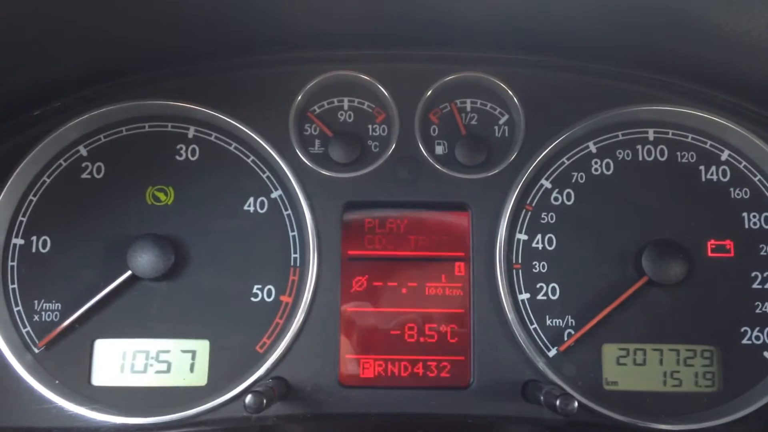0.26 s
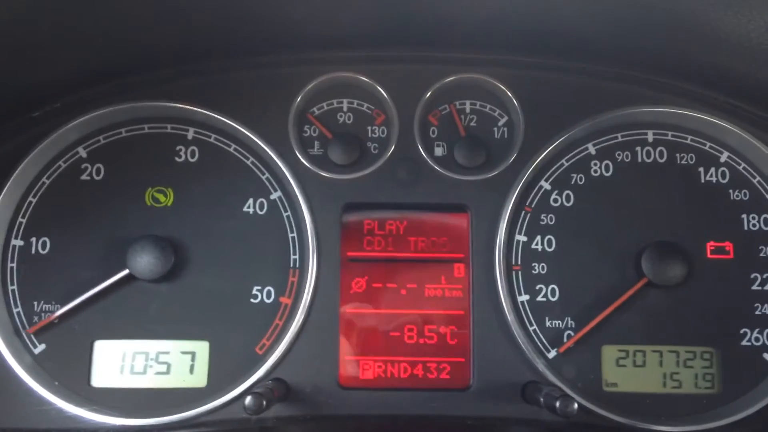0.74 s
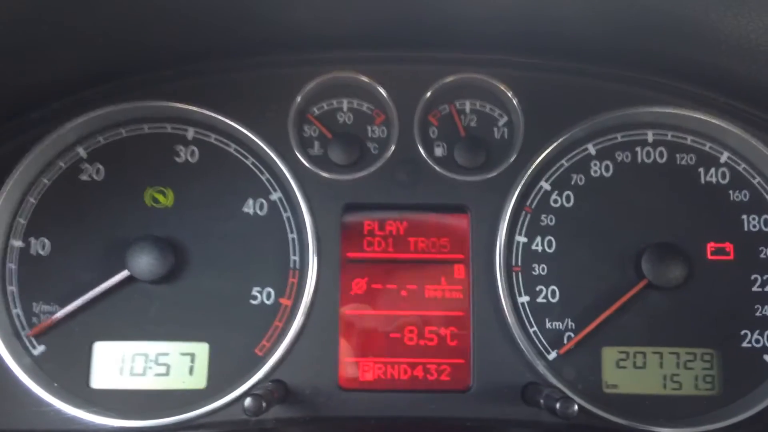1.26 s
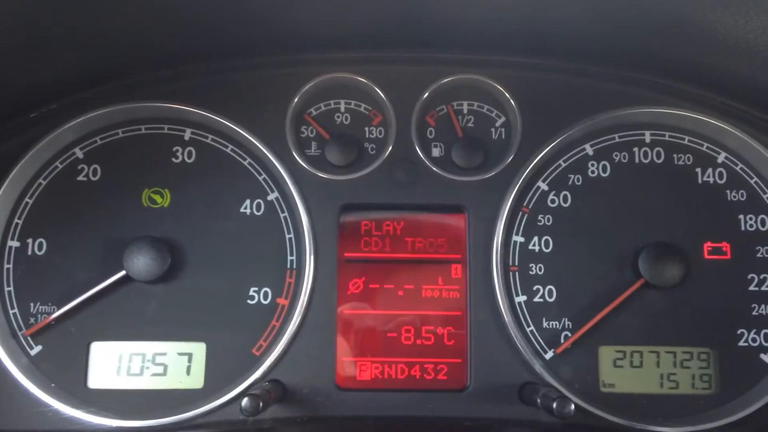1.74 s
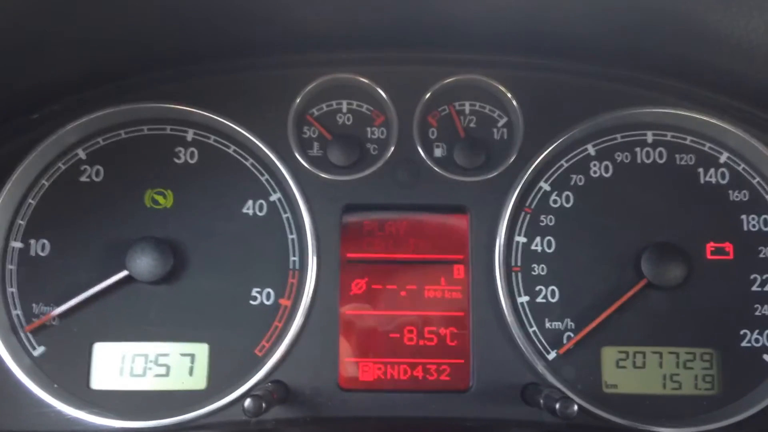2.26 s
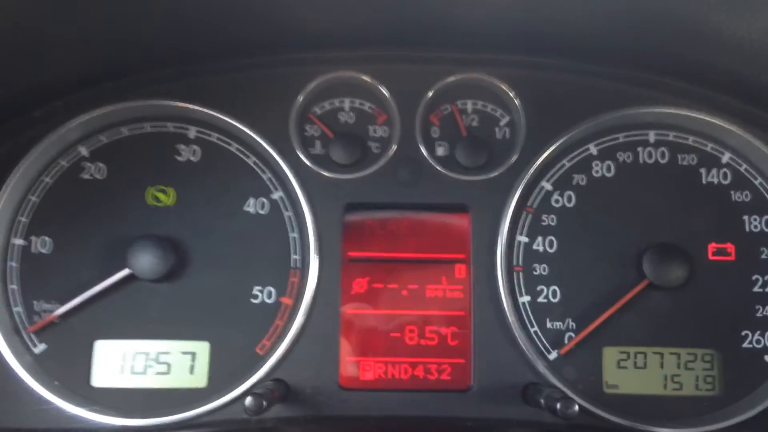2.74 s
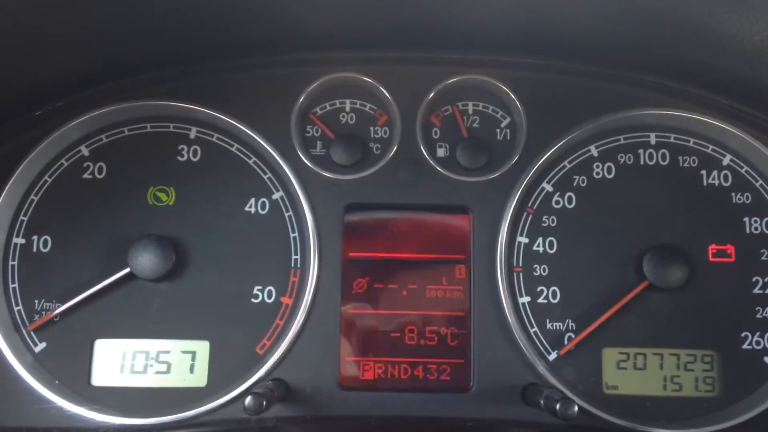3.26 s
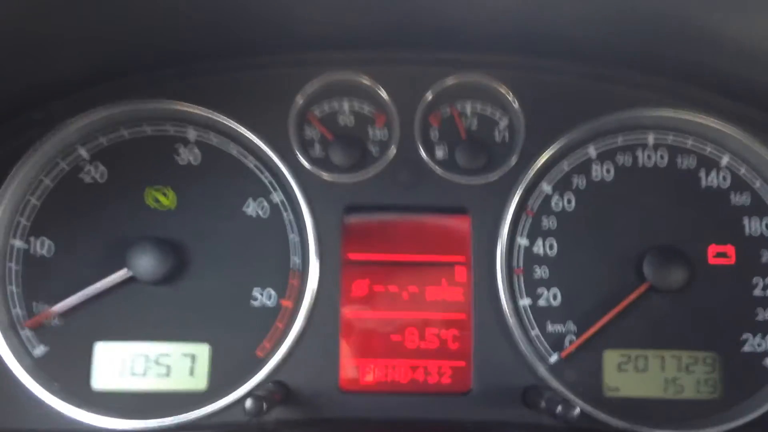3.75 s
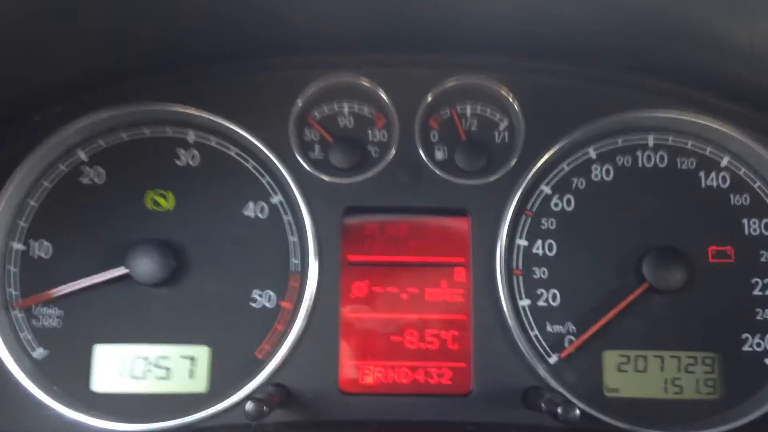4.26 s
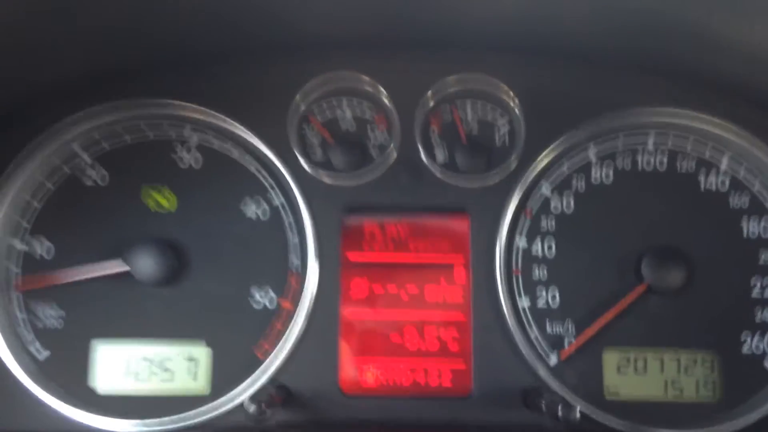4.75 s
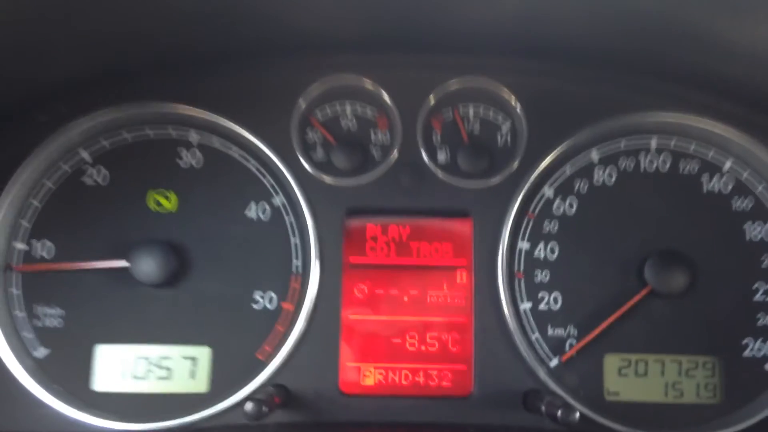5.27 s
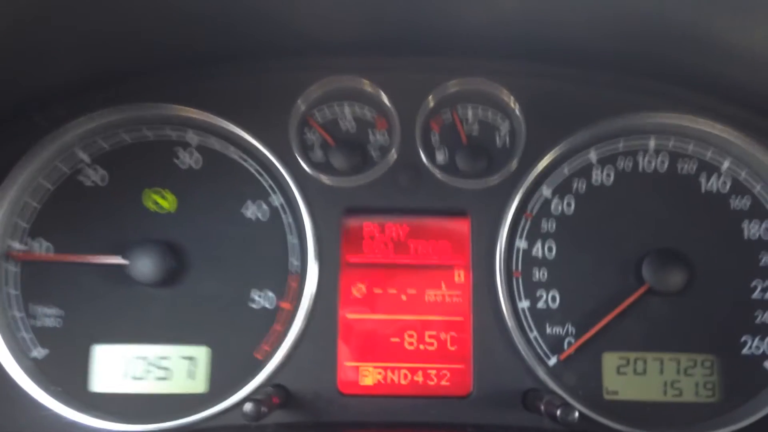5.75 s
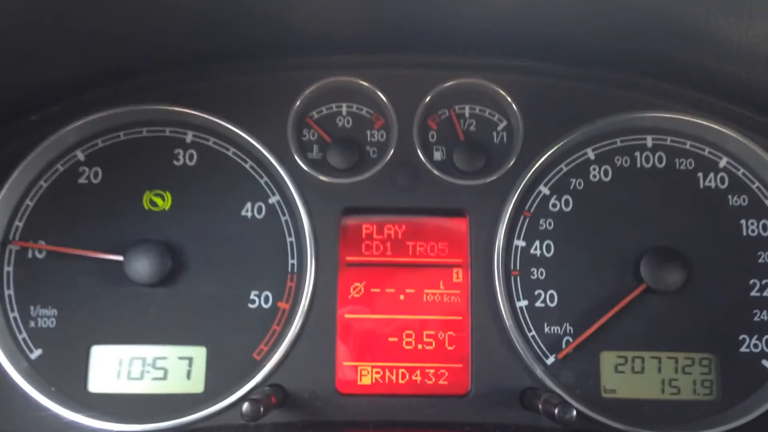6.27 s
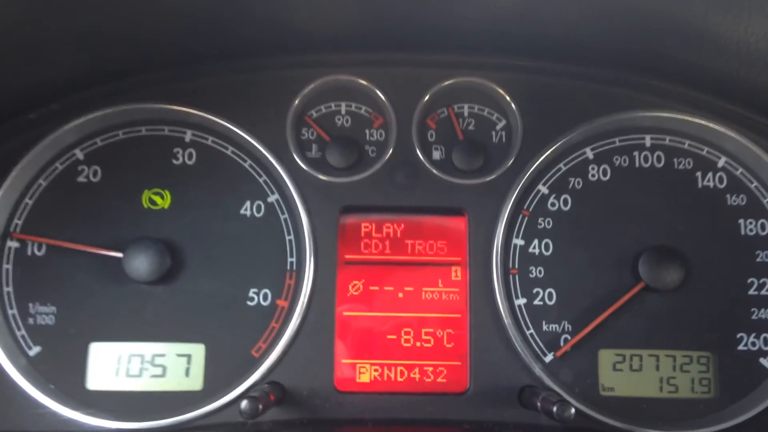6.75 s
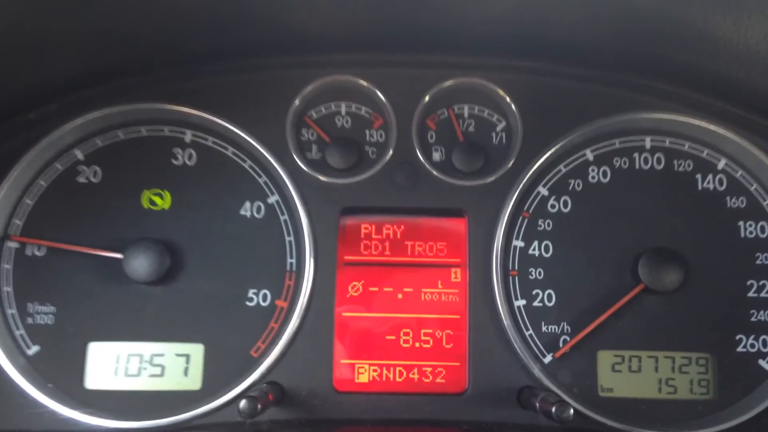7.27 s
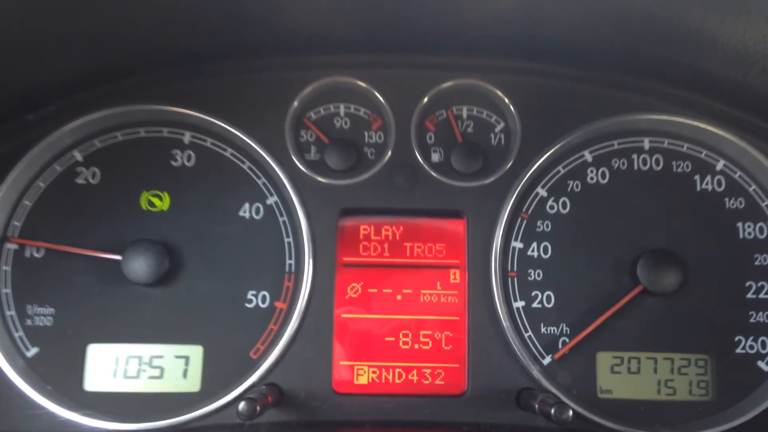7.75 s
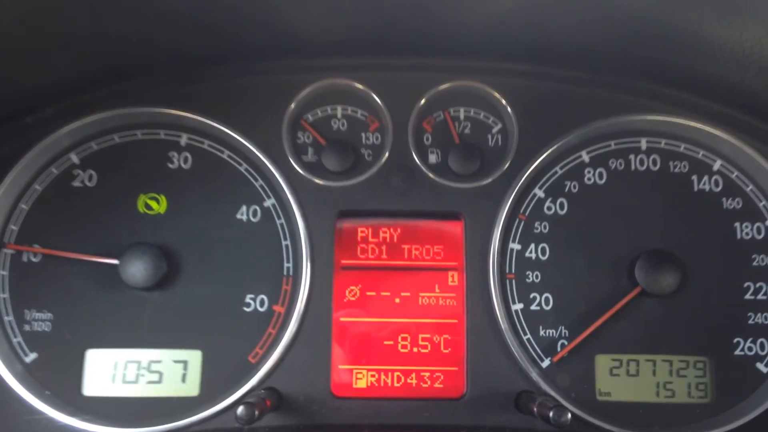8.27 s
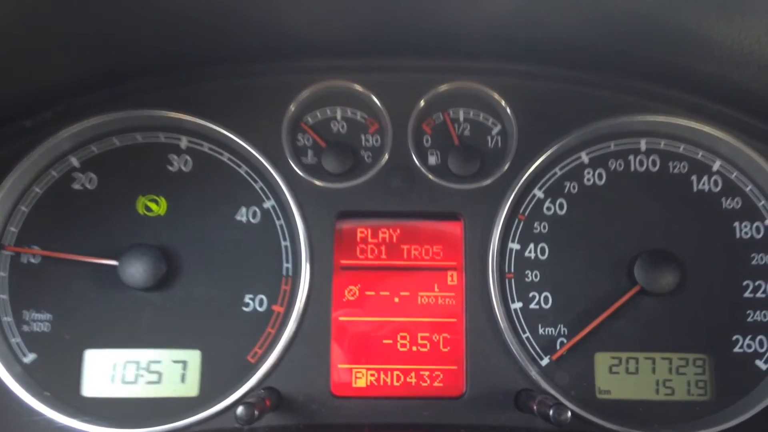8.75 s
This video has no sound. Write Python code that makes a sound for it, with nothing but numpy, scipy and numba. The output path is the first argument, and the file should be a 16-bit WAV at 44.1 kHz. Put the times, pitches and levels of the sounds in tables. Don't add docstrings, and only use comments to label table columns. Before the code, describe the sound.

From the driver's seat, a small microphone hears a cold diesel starter whine and grind in slow pulses, with occasional dull firing thuds. After almost four seconds the engine catches unevenly, with heavy thumps, raspy knocks, plastic ticks and one sharp metallic key snap. It then evens into a boomy, knocking idle with soft ticking and faint hiss.

```python
import sys
import numpy as np
from scipy import signal
from scipy.fft import rfft, irfft
from scipy.io import wavfile
from scipy.ndimage import uniform_filter1d
from numba import njit

SR = 44100
rng = np.random.default_rng(int(sys.argv[2]) if len(sys.argv) > 2 else 0)


def materialize(psi):
    bounded = np.clip(np.atleast_2d(psi).T, -1, 1)
    quanta = np.round(bounded * 32767).astype(np.int16)
    wavfile.write(sys.argv[1], SR, quanta)


def natural_amplitude(level_db):
    exponent = np.asarray(level_db, float) / 20
    return 10 ** exponent


N = 397782
CLOCK = np.arange(N) / SR
STARTER_OFF_S = 3.7


def level(x, db):
    return x * natural_amplitude(db) / np.sqrt(np.mean(x ** 2))


def noise():
    return rng.standard_normal(N)


def walk(rate):
    k = int(SR / rate)
    return level(uniform_filter1d(uniform_filter1d(noise(), k), k), 0)


def curves(table):
    s, *columns = np.transpose(table)
    return [np.interp(CLOCK, s, c) for c in columns]


@njit
def svf(x, hz, width):
    y, b, l = np.empty(len(x)), 0., 0.
    for i in range(len(x)):
        g, k = np.tan(np.pi * hz[i] / SR), width / hz[i]
        v = (b + g * (x[i] - l)) / (1 + g * (g + k))
        b, l, y[i] = 2 * v - b, l + 2 * g * v, k * v
    return y


def body(x, modes):
    one, out = np.ones(len(x)), np.zeros(len(x))
    for k, (hz, width, db) in enumerate(modes):
        once = svf(x, hz * one, 1.18 * width)
        out += (-1) ** k * natural_amplitude(db) * svf(once, hz * one, 1.18 * width)
    return out


# (frequency [Hz], density [dB per Hz])
HISS = [(880, -32), (1500, -4.5), (2700, -4.5), (4310, -4), (8620, -7.5), (14600, -6.5), (15500, -9)]


def hiss():
    hz, db = np.transpose(HISS)
    f = np.fft.rfftfreq(N, 1 / SR)
    shape = (f < 15450) * natural_amplitude(np.interp(np.log(f + 1), np.log(hz), db))
    return level(irfft(rfft(noise()) * shape, N), -67)


# (frequency [Hz], width [Hz], level [dB])
TAPPET = [(1350, 790, 6), (2250, 620, -1), (3120, 150, 3), (4300, 380, 0)]


def tappets():
    taps_per_s, ring_s = 220, 0.0021
    taps = (rng.random(N) < taps_per_s / SR) * natural_amplitude(2.5 * noise())
    smear = signal.lfilter([1], [1, -np.exp(-1 / (ring_s * SR))], taps) * noise()
    return natural_amplitude(-68.5) * np.clip(CLOCK - 6.4, 0, 1) * level(body(smear, TAPPET), 0)


# (time [s], peak [dB], own ring [Hz], low part [dB], high part [dB])
CLICKS = [(.438, -50, 3300, -10, -20), (.4889, -43.5, 2400, -4, -20), (3.713, -37.5, 3000, 4, -33),
          (3.7866, -22, 3160, -10, -13), (3.7981, -26.5, 2780, 11, -5), (3.8062, -27.5, 2530, -27, -37),
          (3.8435, -51, 2370, 0, -14), (3.8537, -34, 3560, 4, -6), (3.8714, -52, 2400, -4, 9),
          (3.8844, -43.5, 2250, -3, -3), (4.1, -42.5, 2560, 3, -21), (4.2906, -37.5, 2500, -1.5, -25),
          (4.4812, -39.5, 2650, -2, -31), (4.5375, -44, 6440, -20, 2), (4.558, -35.5, 7740, 1, -2.5),
          (4.567, -52, 2960, 0, -12), (4.574, -43, 2960, 2, 3), (4.596, -23, 2350, 0, -10),
          (4.6662, -47, 5800, 7, -2), (4.779, -44.5, 4500, 5, -2), (4.838, -50, 3000, 0, 2),
          (4.9112, -51, 3500, -4, 0), (4.95, -47, 5560, 2, -4), (4.799, -26.5, 2480, 7.5, -12),
          (5.106, -20.5, 4300, 0, -7), (5.3207, -40, 2580, -27, 1), (6.0556, -41.5, 4040, -10, -2)]
# (time [s], peak [dB])
RATTLES = [(.4604, -47.5), (.469, -54), (1.208, -60), (1.2306, -50), (3.388, -50), (3.6237, -46),
           (3.6571, -51), (3.7038, -38), (4.0297, -45), (4.415, -64), (4.5151, -49), (4.5246, -51),
           (4.7546, -43), (4.9826, -49), (5.118, -59), (5.3812, -60), (5.5064, -50), (5.7663, -50)]
# (time [s], floor thud [dB], deep rock [dB], cover knock [dB])
LONE = [
    (0.509, -29, -30.5, -44),
    (0.632, -38.5, -41, -55),
    (1.281, -28, -33, -43),
    (2.062, -27, -30.5, -42),
    (2.172, -25.5, -31, -42),
    (2.745, -25.5, -29.5, -45),
    (2.86, -30.5, -39.5, -41),
    (3.458, -27.5, -35.5, -41),
    (3.567, -35, -33, -40.5),
    (3.698, -30, -39, -42),
]


def ticks():
    tick_db, lag_s, pilot_lead_s, rest_s = -49, 0.0058, 0.081, .4
    fired = np.array(LONE)[:, 0]
    rested = fired[np.diff(fired, prepend=0) > rest_s]
    faint = RATTLES + [(s - pilot_lead_s, tick_db) for s in rested]
    faint = faint + [(r[0] + lag_s, tick_db) for r in LONE if r[3] > -55]
    rows = CLICKS + [(s, db, 2170 + 1160 * rng.random() ** 2, -1.5, -14) for s, db in faint]
    return [(*r, 0.038 * natural_amplitude(0.4 * min(r[3], 3))) for r in sorted(rows)]


# (frequency [Hz], width [Hz], level [dB])
TRIM = [(750, 225, -4.5), (1160, 570, -13.5), (1480, 320, -6), (1870, 390, -9.5), (2347, 350, 12),
        (3150, 770, 11), (4550, 1800, 5.5), (6200, 790, 0), (7000, 6400, 8), (14200, 3600, -5)]


def clicks():
    gate, ring_hz, t = np.zeros((3, N + SR)), np.full(N + SR, 3000.), np.arange(int(.2 * SR)) / SR
    for s, db, hz, low_db, high_db, ring in ticks():
        slip_s = .009 if db > -43 else .003
        after = np.maximum(t - slip_s, 0)
        decay = natural_amplitude(-60 * after / max(ring, .005)) + 0.11 * natural_amplitude(-60 * after / 0.32)
        shape = np.minimum(t / slip_s, 1) ** 1.2 * decay
        part_gain = natural_amplitude(db - 13.0 + np.array([[low_db], [0], [high_db]]))
        start = int((s - slip_s + 0.0023) * SR)
        gate[:, start:start + len(t)] += part_gain * shape ** np.array([[1], [1.2], [1.7]])
        ring_hz[start:] = hz
    gate = gate[:, :N]
    grit = [noise() * natural_amplitude(4.6 * noise()) for _ in range(4)]
    pluck = gate[1] * np.sqrt(np.minimum(gate[1] / natural_amplitude(-52), 1)) * level(grit[3], 0)
    out = natural_amplitude(18.0) * svf(svf(pluck, ring_hz, 530.0), ring_hz, 530.0)
    for g, x, part in zip(gate, grit, (TRIM[:4], TRIM[4:8], TRIM[8:])):
        out += body(g * x, part) / np.std(body(x, part))
    return out


# (time [s], peak [dB], slip [s], chatter depth [ratio])
SNAPS = [
    (5.107, -12, 0.001, 3),
    (6.0552, -41, 0.00056, 0.3),
    (6.0615, -40, 0.0016, 0.3),
]
# (frequency [Hz], ring [s], level in first, second, third snap [dB])
BARREL = [(535.6, 0.061, 0.5, -30, -30), (1227, 0.038, -16, -30, -30), (1396, 0.046, 1.5, -30, -30),
          (1918, 0.041, -1.5, -27, -25), (3167, 0.013, 2, -20, -14), (3560, 0.032, -15, 1, 3.5),
          (4000, 0.048, -7, 5, -4), (4190, 0.014, 7.5, -15, -20), (4580, 0.015, 5, -12, 2),
          (5530, 0.029, 2.5, -14, -11), (6660, 0.0294, -15, -9, -7), (7500, .025, -8, -8, 1),
          (8730, 0.0065, 1, -14, -10), (11360, .025, -21, -10, -4)]


def snaps():
    out, t = np.zeros(N), np.arange(int(.08 * SR)) / SR
    for k, (s, db, slip, depth) in enumerate(SNAPS):
        swell = np.minimum(2.3 * np.exp(-np.abs(t - .012) / slip), 1)
        swell = np.where(t < .012, swell, .5 + .5 * swell)
        modes = np.zeros(len(t))
        for hz, ring_s, *snap_db in BARREL:
            fade = natural_amplitude(snap_db[k] - 60 * np.maximum(t - .013, 0) / ring_s)
            modes += fade * np.sin(2 * np.pi * (hz * t + rng.random()))
        chatter = 1 + depth * uniform_filter1d(rng.standard_normal(len(t)), size=16)
        start = int((s - .011) * SR)
        out[start:start + len(t)] += natural_amplitude(db - 12.0) * swell * modes * chatter
    return out


# (time [s], peak [dB])
RASPS = [(4.0, -52.5), (4.198, -53), (4.27, -52), (4.388, -52), (4.465, -49.5), (4.53, -55), (4.61, -48),
         (4.81, -47), (4.97, -48), (5.185, -53.5), (5.25, -50.5), (5.385, -54), (5.42, -54), (5.51, -52),
         (5.63, -52), (5.73, -52), (5.77, -51)]
# (frequency [Hz], width [Hz], level [dB])
RASP = [(610, 250, -6), (825, 165, 4), (1420, 610, -9), (3000, 2800, -18)]


def rasps():
    gate = np.zeros(N)
    for s, db in RASPS:
        gate += natural_amplitude(db) * np.clip((CLOCK - s) / 0.0028, 0, 1) * np.exp(-np.abs(CLOCK - s) / 0.028)
    return gate * level(body(noise() * natural_amplitude(2.6 * walk(150)), RASP), 0)


# (time [s], peak [dB], cover ring [Hz])
KNOCKS = [(3.781, -29, 339), (3.892, -35.5, 343), (4.002, -37, 366), (4.104, -40.5, 340), (4.198, -39, 341),
          (4.268, -41, 468), (4.386, -38.5, 456), (4.462, -34.5, 412), (4.516, -38, 380), (4.549, -37, 343),
          (4.594, -25, 332), (4.655, -37.5, 436), (4.766, -37.5, 457), (4.795, -28, 475), (4.854, -50, 316),
          (4.903, -41.5, 457), (4.973, -32.5, 312), (5.183, -33.5, 400), (5.218, -31, 347),
          (5.284, -47, 387), (5.411, -32, 326), (5.45, -43, 420), (5.493, -39.5, 428), (5.571, -58, 405),
          (5.602, -40, 354), (5.628, -44, 430), (5.727, -40, 337), (5.767, -34, 330), (5.815, -36, 474),
          (5.841, -41, 338), (5.929, -43, 453), (5.958, -35.5, 462)]


def knocks():
    gate, ring, t = np.zeros((2, N)), np.zeros(N), np.arange(int(.1 * SR)) / SR
    swell = np.minimum(t / 0.0044, 1) * np.minimum((.1 - t) * 50, 1)
    decay = np.exp(-t / 0.028) + 0.18 * np.exp(-t / 0.055)
    # (s, peak dB, ring Hz, upper rasp dB, ring dB)
    rows = [(s, db, 380, -9.5, -14) for s, _, _, db in LONE] + [(*r, -16.5, -2) for r in KNOCKS]
    for s, db, hz, upper_db, ring_db in rows:
        start = int((s - .002) * SR)
        gate[:, start:start + len(t)] += natural_amplitude(db - 4.5 + np.array([[-3], [upper_db]])) * swell * decay
        ring[start:start + len(t)] += natural_amplitude(db + ring_db) * swell * np.exp(-t / 0.017) * np.sin(2 * np.pi * hz * t)
    # (Hz, width Hz, dB)
    lower = [(295, 210, -5.5), (463, 150, -7.5)]
    upper = [(700, 170, 8), (842, 104, 5.5), (1050, 540, 1.5), (1340, 230, 1.5), (1930, 1850, -6.0)]
    out = ring * natural_amplitude(3.3 * walk(105))
    return out + sum(g * level(body(noise(), part), 0) for g, part in zip(gate, (lower, upper)))


# (time at top of stroke [s], floor thud [dB], whine before [Hz], whine [dB], gear mesh [dB])
STROKES = [(0.148, -33.5, 280, -53.5, -57.5), (0.386, -30, 284, -52.5, -58), (0.686, -61, 345, -55, -68),
           (0.918, -34.5, 291, -58, -57.5), (1.152, -32, 285, -52.5, -60), (1.476, -50, 346.5, -51, -62),
           (1.709, -37, 289.5, -51.5, -59.5), (1.946, -32, 285, -49, -58), (2.366, -54, 345, -54.5, -61),
           (2.625, -32.5, 290, -52, -59), (2.888, -46, 330, -64, -80), (3.115, -35, 317.5, -48, -61),
           (3.342, -34, 286.8, -49.5, -58)]


def mesh():
    def peak(s, db, rise_db_per_s):
        rise = rise_db_per_s * np.maximum(s - CLOCK, 0)
        return natural_amplitude(db - rise - 318 * np.maximum(CLOCK - s, 0))

    return sum(peak(r[0], r[4], 119) for r in STROKES) + sum(peak(r[0] + 0.022, -65, 700) for r in LONE)


# (frequency [Hz], width [Hz], level [dB])
GEAR = [(720, 130, -0.5), (867, 57, 4.5), (916, 15, 8.5), (995, 48, 5.5), (1160, 430, -7.5), (1490, 68, -8)]


def starter():
    sag_s, slowest_hz, slowest_lag_s, rough = .13, 195.6, 0.0357, .22
    teeth = noise() * natural_amplitude(2.2 * walk(240))
    out = (CLOCK < STARTER_OFF_S) * uniform_filter1d(mesh(), int(SR / 16)) * level(body(teeth, GEAR), 1.2)
    wobble = natural_amplitude(2.5 * walk(40))
    flutter = ((1 - rough) + rough * walk(50)) * natural_amplitude(-1.3 * (CLOCK - 0.5))
    for s, _, hz, db, _ in STROKES:
        x = np.clip((CLOCK - s - slowest_lag_s) / sag_s + 1, 0, 1)
        turn = 2 * np.pi * np.cumsum(hz - (hz - slowest_hz) * x ** 1.512 + 8 * walk(32.0)) / SR
        swell = np.sqrt(np.sin(np.pi * x) + 1e-9) * (x > 0) * (x < 1)
        overtones = natural_amplitude(-4) * np.sin(2 * turn) + natural_amplitude(-12.5) * np.sin(3 * turn)
        out += natural_amplitude(db + 1.0) * wobble * swell * (np.sin(turn) + flutter * overtones)
    return out


# (time [s], floor thud [dB], ring [Hz], deep rock [dB])
CATCH = [(3.786, -19.5, 166, -24.5), (3.871, -26.5, 199, -29), (3.937, -25, 115, -26.5),
         (4.129, -23, 151, -30), (4.206, -28, 160, -32), (4.272, -28.5, 149, -28), (4.39, -30, 147, -36),
         (4.474, -21.5, 144, -43), (4.504, -27.5, 166, -22.5), (4.543, -19, 163, -24),
         (4.598, -18.5, 143.3, -23), (4.676, -19.5, 117, -31.5), (4.796, -19.5, 127, -22),
         (4.852, -21.5, 120, -25), (4.934, -19, 163, -27.5), (4.985, -17.5, 136, -22.5),
         (5.043, -22, 111, -30), (5.205, -25, 172, -18.5), (5.24, -39, 118, -32), (5.417, -33, 147, -33),
         (5.47, -16, 117, -23), (5.517, -31, 144, -35), (5.596, -22.5, 147, -22), (5.619, -23, 150, -27),
         (5.671, -28.5, 203, -49), (5.744, -16, 125, -22), (5.782, -15, 123, -22)]


def blows():
    compressions = [(s, db, 185, db - 44, .1, 0.019, 0) for s, db, *_ in STROKES]
    lone = [(s, db, 163 - 2 * (db + 33.0), deep_db, 0.18, 0.014, natural_amplitude(-5.5 - 2 * s)) for s, db, deep_db, _ in LONE]
    return compressions + lone + [(*r, 0.38, .013, 0) for r in CATCH]


# (frequency [Hz], ring [s], level [dB])
MOUNTS = [(37.2, 0.14, 1.5), (73.1, 0.28, -1.5), (110.7, 0.23, 1)]


def thuds():
    slap_hz, slap_s, slap_lag_s = 239.6, 0.01, .008
    out, t = np.zeros(N + SR), np.arange(int(.4 * SR)) / SR
    late = np.maximum(t - slap_lag_s, 0)
    slap_shape = late / slap_s * np.exp(1 - late / slap_s) * np.sin(2 * np.pi * slap_hz * t)
    for s, db, hz, deep_db, sag, swell, slap in blows():
        turn = 2 * np.pi * np.cumsum(hz * (1 + sag * (np.exp(-t / 0.022) - .314))) / SR
        pan = natural_amplitude(db) * 0.75 * (t / swell) ** 2 * np.exp(2 - 2 * t / swell) * np.sin(turn)
        pan += natural_amplitude(db) * slap * slap_shape
        rock = np.zeros(len(t))
        for f, ring_s, g in MOUNTS:
            detune = 1 + 0.023 * rng.standard_normal()
            rock += natural_amplitude(g - 60 * t / ring_s) * np.sin(2 * np.pi * f * detune * t)
        start = int((s - .006) * SR)
        out[start:start + len(t)] += pan + natural_amplitude(deep_db + 8.0) * (1 - np.exp(-(t / 0.039) ** 2)) * rock
    return out[:N]


# (time [s], angle [turns])
CAM = [(0, -9.5), (3.457, -4.8), (3.79, -4), (4.0, -3), (4.39, -1), (4.8, 1), (4.92, 2), (5.185, 4),
       (5.45, 6), (5.815, 9), (6.153, 12), (6.474, 15), (6.8, 18), (7.467, 24), (8.143, 30), (8.828, 36),
       (9.06, 38)]


def cam_turns():
    return curves(CAM)[0] + 10


def turn_knock():
    hz, sag_hz, decay_s, lead_s = 364.5, 130.4, 0.017, 0.00507
    cam = cam_turns()
    rate = np.gradient(cam) * SR
    ahead = cam + lead_s * rate
    since = ahead % 1 / rate
    chance = rng.standard_normal((60, 2))[ahead.astype(int)].T
    sag = sag_hz * .015 * (1 - np.exp(-since / 0.017))
    turn = 2 * np.pi * (hz * (1 + 0.064 * chance[0]) * since + sag)
    swell = np.minimum(since / 0.0039, 1) * np.exp(-since / decay_s)
    running = np.clip((4 * rate - 30) / 4, 0, 1)
    return natural_amplitude(-38.5 + 2.5 * chance[1]) * running * swell * np.sin(turn)


def jolt(fade_s):
    return sum(natural_amplitude(deep_db) * (CLOCK > s) * np.exp(-np.abs(CLOCK - s) / fade_s) for s, _, deep_db, _ in LONE)


# (time [s], effort over a calm idle [dB])
EFFORT = [(0, -14.5), (.4, -13), (3.4, -13), (3.74, -4.5), (4.22, -3.5), (4.72, -1), (5.5, 5), (5.7, 2),
          (5.9, 2), (6.9, 0), (7.46, 0.5), (8.5, 0), (8.82, 1.5), (9.02, 0)]


def levels(rate, ragged):
    (effort,) = curves(EFFORT)
    speed = uniform_filter1d(rate, SR // 4)
    shake = natural_amplitude(-37.5 + 2.6 * np.minimum(effort, 0) + 7.5 * ragged) + natural_amplitude(-19) * jolt(.08)
    boom = natural_amplitude(-36 + effort) + natural_amplitude(-15) * jolt(.15)
    drone = natural_amplitude(-54 + 0.54 * (speed - speed[-1]))
    drone += natural_amplitude(-62.5) * np.clip((STARTER_OFF_S - CLOCK) * 10, 0, 1)
    uneven_db = (2.5 + 1.5 * walk(30)) * uniform_filter1d(ragged, SR // 3)
    clatter = natural_amplitude(-67 + .55 * effort + uneven_db)
    warmed_db = 3.7 * CLOCK + 5 * np.maximum(CLOCK - 7.2, 0)
    tick = natural_amplitude(-41 + 4 * np.minimum(speed - 30, 0) - warmed_db) * np.clip((CLOCK - 5.1) * 10, .3, 1)
    return shake, boom, drone, clatter, tick


# (frequency [Hz], width [Hz], level [dB])
CABIN = [(70.5, 49, -11), (92.7, 8, -1), (142.8, 19, 1), (172, 29, -6.5), (208, 34, -4.5)]
# (frequency [Hz], width [Hz], level [dB])
CRANKING = [(65, 70, -3.5), (121, 87, -11.5), (176.8, 40, 0.5), (233, 23, -9.5), (326, 19, -4.5),
            (424.4, 22.6, -12.5)]
# (multiple of firing rate [ratio], level under the boom [dB], gain under load [dB])
ORDERS_IDLE = [(1.249, -9.5, -11), (2, -12.5, 9), (2.751, -11, -3), (3, -3, 3), (3.751, -9.5, -3),
               (4, -5.5, 3), (4.25, -7.5, -2), (4.5, -7.5, -16), (4.751, -11.5, -9), (5, -8.5, 5)]


def cabin_boom(stroke, even, caught):
    lope = 1 - .4 * even * np.cos(np.pi / 2 * stroke - .9)
    load = np.clip((CLOCK - 8.72) * 10, 0, 1)
    lines = np.zeros(N)
    for k, db, gain_db in ORDERS_IDLE:
        drift = 0.92 * (1 - 0.97 * load) * walk(4.3)
        lines += natural_amplitude(db + 2.4 * walk(7.0) + gain_db * load) * np.sqrt(2) * np.sin(2 * np.pi * k * stroke + drift)
    running = (1 - .5 * even) * (1 - 0.13 * load) * level(body(noise(), CABIN), 1.0) + even * lines
    return caught * lope * running + (1 - caught) * level(body(noise(), CRANKING), 0.1)


# (frequency [Hz], width [Hz], level [dB])
BULKHEAD = [(270, 66, 2.5), (330.5, 40, 0.5), (379.3, 35, 3.5), (431.7, 22, -2.5), (469, 60, -3),
            (650, 286, -13.5), (803, 494, -16.5)]
# (frequency [Hz], width [Hz], level [dB])
BLOCK = [(1267, 210, 6), (1510, 890, -2), (2120, 840, 1), (3390, 440, -9.5), (4460, 900, -4.5),
         (3860, 13500, -11.5)]
# (frequency [Hz], width [Hz], level [dB])
COVER = [(385, 50, -1), (465, 62, 0), (720, 200, -24)]
# (frequency [Hz], width [Hz], level [dB])
INJECTOR = [(880, 140, -9), (1110, 52, 5), (1310, 80, -1), (1500, 160, -6), (1800, 140, -9)]
# (bulkhead [dB], cover knock [dB], injector tick [dB])
CYLINDERS = [(-2, 0, -9), (0, -8, -20), (-1, -18, 0), (-4, -18, -16)]


def combustion(stroke, rate, even, caught):
    index, since = stroke.astype(int), stroke % 1 / rate
    cylinder = np.array(CYLINDERS)[index % 4].T + 1.3 * rng.standard_normal((400, 3))[index].T
    puff = natural_amplitude(cylinder) * np.minimum(since / .004, 1) * np.exp(-since / .009)
    rap = np.sin(np.pi * np.minimum(since / .0009, 1))
    same = noise()[(stroke / 4 % 1 * SR / 9).astype(int)]
    repeat = .6 * even
    rumble = np.sqrt(repeat) * same + np.sqrt(1 - repeat) * noise()
    drone = (puff[0] + 0.74) * rumble
    dull = natural_amplitude(-3 * (1 - caught))
    drone = level(body(drone, BULKHEAD[:5]) - dull * body(drone, BULKHEAD[5:]), 6.56)
    knock = even * level(body(puff[1] * (.5 * noise() + .5 * same + 6 * rap), COVER), -4)
    tick = level(body(puff[2] * (.6 * noise() + 10 * rap), INJECTOR), 0)
    stir = .9 + puff[0] + uniform_filter1d(1.6 * puff[2], SR // 60)
    clatter = level(body(noise() * stir, BLOCK), 0)
    return drone + knock, clatter, tick


def engine():
    stroke = 4 * cam_turns()
    rate = np.gradient(stroke) * SR
    even = np.clip((rate - 26) / 8, 0, 1)
    caught = np.clip((rate - 9) / 8, 0, 1)
    shudder = level(body(noise(), [(37.0, 57, 0)]), 0)
    shake = even * np.sqrt(2) * np.cos(2 * np.pi * stroke) + (1 - 1.12 * even) * shudder
    parts = (shake, cabin_boom(stroke, even, caught), *combustion(stroke, rate, even, caught))
    return sum(g * x for g, x in zip(levels(rate, caught * (1 - even)), parts))


def scene():
    background = hiss() + tappets() + clicks() + snaps()
    return (background + rasps() + knocks() + starter() + thuds() + turn_knock() + engine())[None]


def low_pass(x):
    return signal.sosfilt(signal.butter(12, 16370, fs=SR, output="sos"), x)


def record(dry):
    soft = np.tanh(3.2 * dry) / 3.2
    top = signal.ellip(8, .5, 60, 15350, fs=SR, output="sos")
    return low_pass(signal.sosfilt(top, soft))


dry = scene()
out = record(dry)
materialize(out)
```